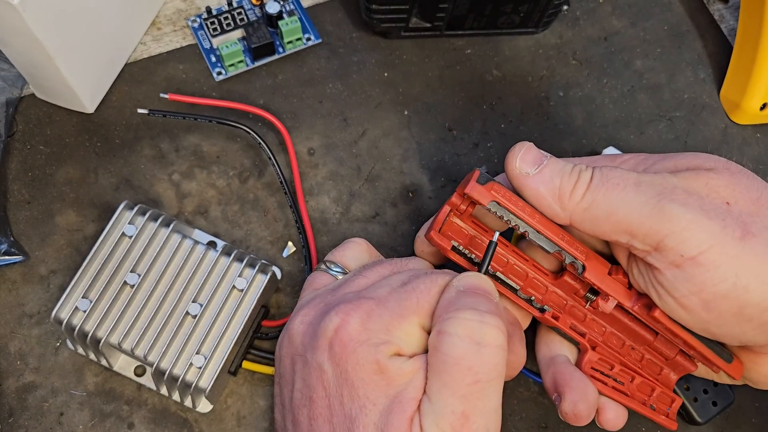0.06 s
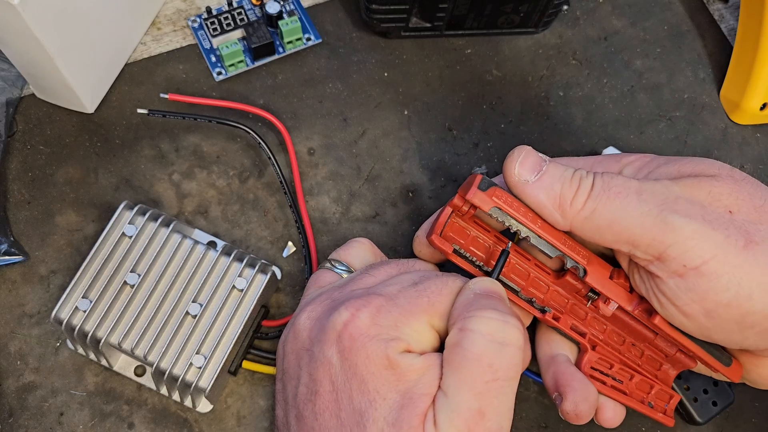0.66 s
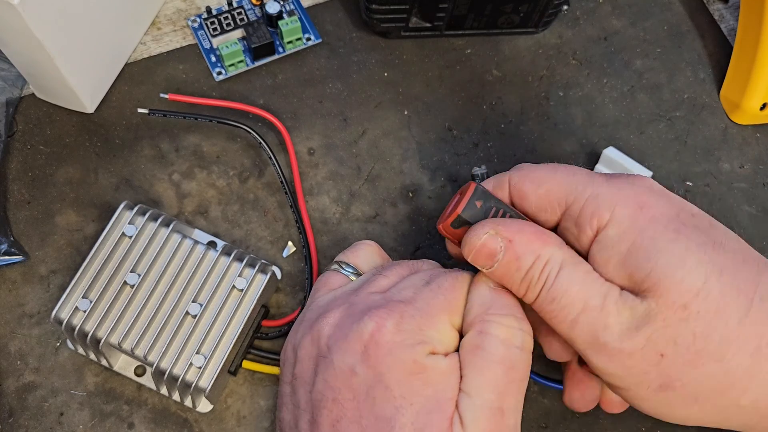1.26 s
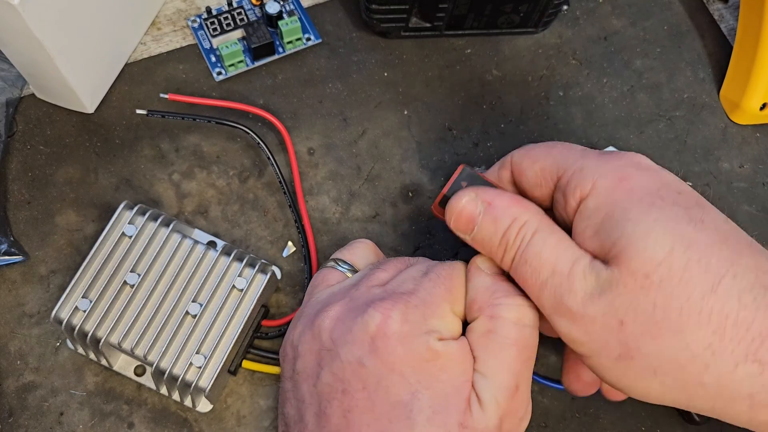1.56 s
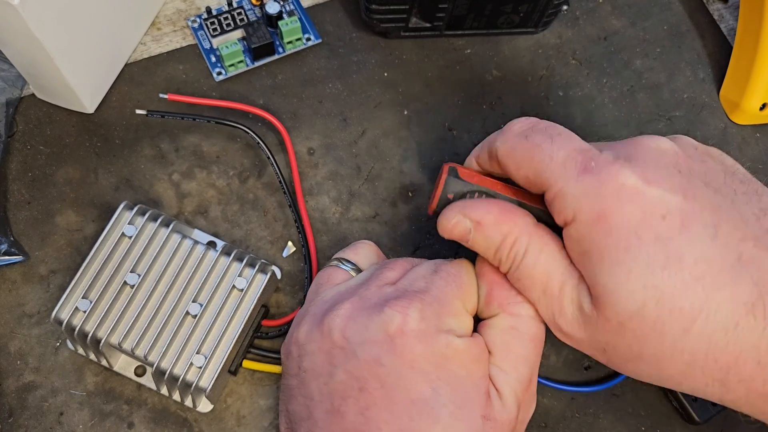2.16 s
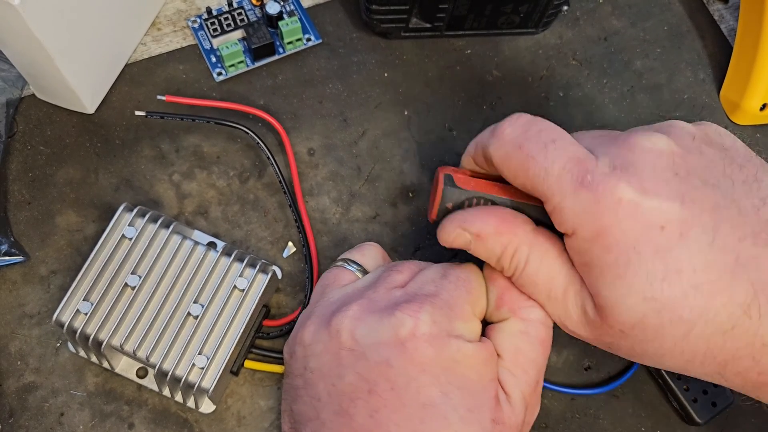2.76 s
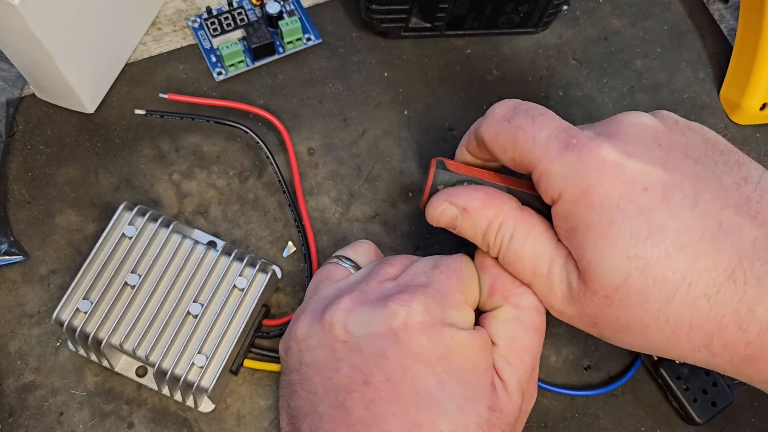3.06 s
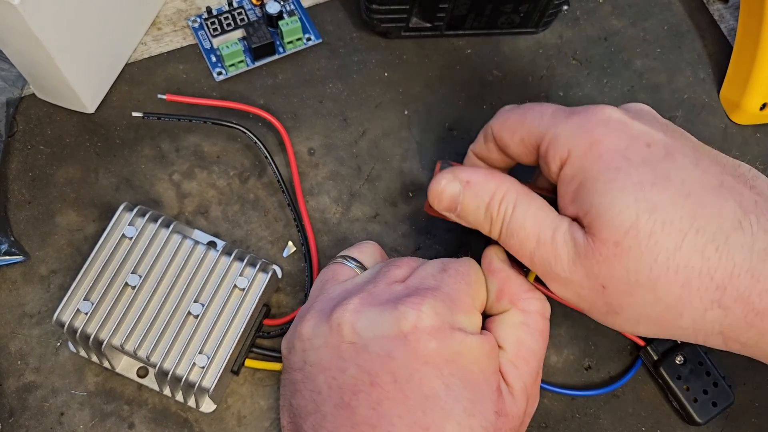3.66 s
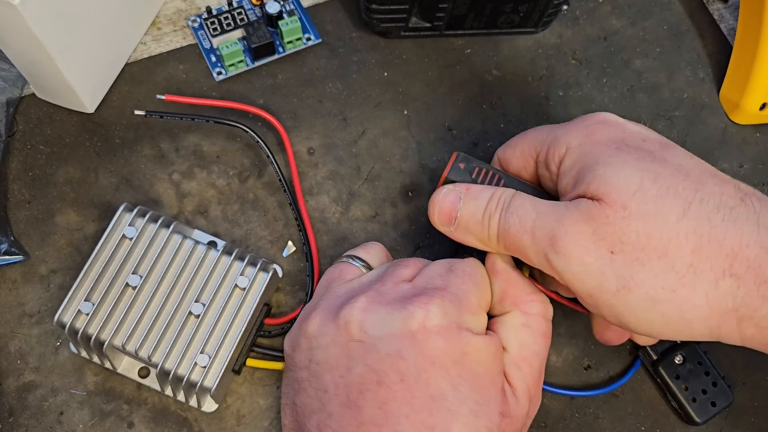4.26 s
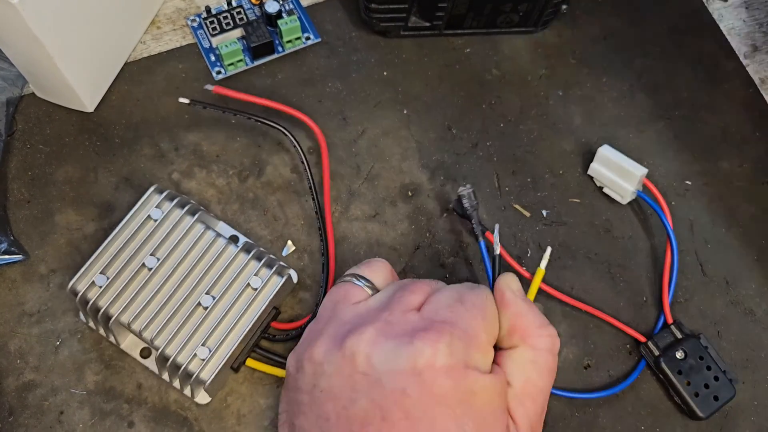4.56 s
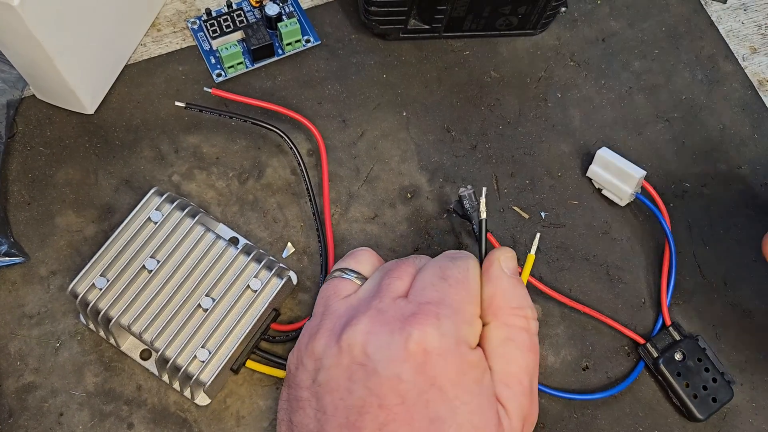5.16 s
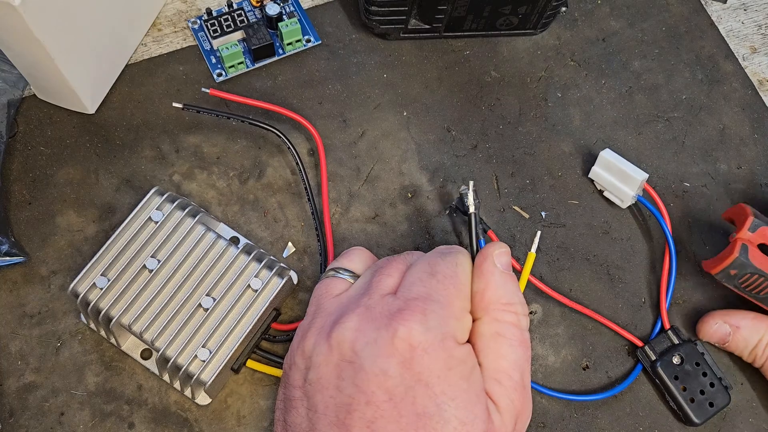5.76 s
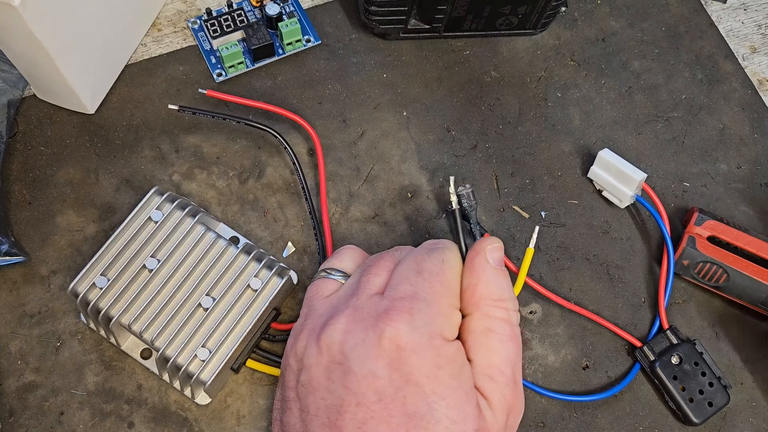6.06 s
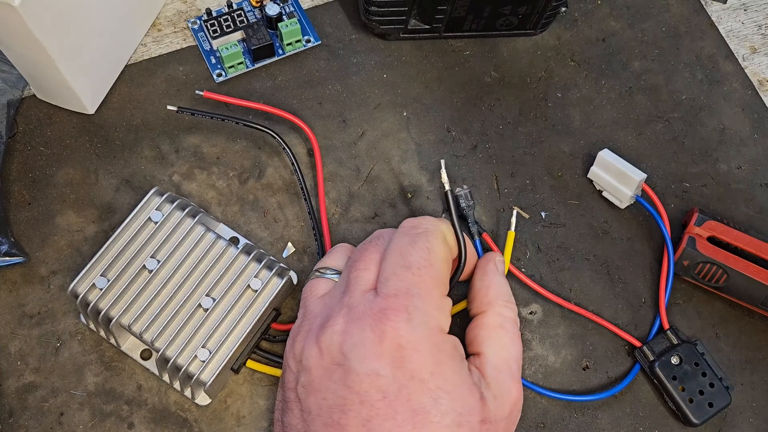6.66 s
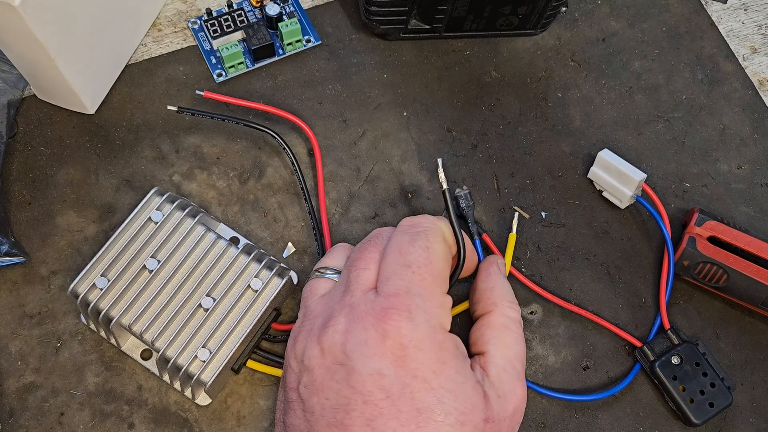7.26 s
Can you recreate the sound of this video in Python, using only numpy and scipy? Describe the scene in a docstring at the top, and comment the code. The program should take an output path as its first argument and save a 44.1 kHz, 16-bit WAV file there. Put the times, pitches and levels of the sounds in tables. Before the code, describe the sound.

In a small, quiet workshop, a plastic wire stripper is squeezed on a wire and gives off irregular creaks and sharp clicks that grow firmer. The workbench rumbles faintly and a loose object rocks. The tool then snaps loudly as the insulation gives, hands thump the bench and metal parts clatter with a short ring. Faint knocks and rustles follow as the tool is put down, all heard from close above the bench.

```python
"""Small workshop, close above a workbench. A plastic automatic wire stripper is squeezed on a wire:
its jaws slip and ring the frame in creaks and clicks. The straining hands make the bench rumble and
set a loose object rocking. The insulation gives: the tool snaps, the hands bump the bench, metal
parts clatter, and the top shudders on while the tool is put down."""
import sys
import numpy as np
from scipy import signal
from scipy.fft import rfft, irfft, next_fast_len
from scipy.io import wavfile
from scipy.ndimage import map_coordinates

SR = 44100
rng = np.random.default_rng(int(sys.argv[2]) if len(sys.argv) > 2 else 0)


def wav_record(signal):
    """Record a signal, one row per channel, as 16-bit PCM in the file named by sys.argv[1]."""
    frames = np.transpose(np.atleast_2d(signal))
    bounded = np.clip(frames, -1, 1)
    # unit amplitude maps onto the largest positive 16-bit level
    quanta = np.round(bounded * 32767).astype(np.int16)
    wavfile.write(sys.argv[1], SR, quanta)


N = 327618
AGE_S = np.arange(SR // 2) / SR  # time since a blow
SNAP_S = 4.478

# stripper frame modes: pitch_hz, width_hz, level_db
FRAME_MODES = [(938, 140, -4.5), (1387, 144, -6.5), (1937, 207, 1.5), (2370, 730, -5.5), (3026, 105, 4),
               (3540, 480, -4), (3835, 630, -2), (4500, 580, -2), (6050, 1030, -8), (7600, 570, -6)]
# slap on bench or handles: freq_hz, level_db
SLAP_SPECTRUM = [(100, -9), (390, 2.5), (560, -3), (780, 0.5), (970, -3.5), (1300, 3.5), (2200, -4.5),
                 (4200, -11.5), (8000, -18), (15000, -30.5)]
# thud of the bench top: freq_hz, level_db
THUD_SPECTRUM = [(30, -23), (90, -6.5), (130, 3), (330, -2.5), (480, -13.5), (2000, -48)]


def amp(db):
    """Decibels to gain."""
    return 10 ** (np.asarray(db) / 20)


def unit_rms(x):
    """Scale to rms 1."""
    return x / np.sqrt(np.mean(x ** 2) + 1e-20)


def log_interp(points, hz):
    """Interpolate (freq_hz, value) points on a log axis."""
    freq_hz, values = np.transpose(points)
    return np.interp(np.log(hz + 1), np.log(freq_hz + 1), values)


def envelope(rows):
    """Gain per sample from (time_s, level_db) rows, silent before the first."""
    time_s, level_db = np.transpose(rows)
    return amp(np.interp(np.arange(N) / SR, time_s, level_db, left=-120))


def fade(start_s, level_db, db_per_s):
    """Gain per sample: starts at start_s, dies away."""
    age_s = np.arange(N) / SR - start_s
    return (age_s >= 0) * amp(level_db - db_per_s * np.maximum(age_s, 0))


def decay(t60_s):
    """Exponential decay after a blow."""
    return amp(-60 * AGE_S / t60_s)


def add(track, start_s, sound):
    """Mix a sound into a track."""
    part = track[..., round(start_s * SR):][..., :sound.shape[-1]]
    part += sound[..., :part.shape[-1]]


def filtered(x, response):
    """Apply response(hz), scaled to keep the power of white noise."""
    size = 2 * next_fast_len(x.shape[-1] // 2 + SR // 4)
    gain = response(np.fft.rfftfreq(size, 1 / SR))
    return irfft(rfft(x, size) * gain / np.sqrt(np.mean(abs(gain) ** 2)), size)[..., :x.shape[-1]]


def coloured(x, spectrum):
    """Minimum-phase filter from (freq_hz, level_db) points."""
    def response(hz):
        cepstrum = irfft(np.log(amp(log_interp(spectrum, hz))))
        causal_fold = 1 + np.sign(np.fft.fftfreq(len(cepstrum)))
        return np.exp(rfft(cepstrum * causal_fold))
    return filtered(x, response)


def resonate(x, modes):
    """Drive (pitch_hz, width_hz, level_db) modes of alternating sign."""
    def response(hz):
        return sum((-1) ** k * amp(db) * 1j * hz * width_hz / (pitch_hz**2 - hz**2 + 1j * hz * width_hz)
                   for k, (pitch_hz, width_hz, db) in enumerate(modes))
    return filtered(x, response)


def noise(side_db, size=N):
    """Stereo white noise; side_db sets the width."""
    mid, side = rng.standard_normal((2, size))
    return unit_rms(np.array([mid + amp(side_db) * side, mid - amp(side_db) * side]))


def burst(t60_s, side_db):
    """One decaying noise burst."""
    return noise(side_db, len(AGE_S)) * decay(t60_s)


def wobble(rate_hz):
    """Smooth random curve, rate_hz knots a second."""
    knots = rng.standard_normal(int(N * rate_hz / SR) + 4)
    return map_coordinates(knots, [np.arange(N) * rate_hz / SR])


def contacts(rows, side_db):
    """Each (start_s, level_db, t60_s) contact is a dying swarm of tiny impacts."""
    power = np.zeros(N)
    for start_s, level_db, t60_s in rows:
        add(power, start_s, (amp(level_db) * decay(t60_s)) ** 2)
    return np.sqrt(power) * noise(side_db)


def room(x, wet_db):
    """Short workshop reverb, separate left and right tails."""
    # reverb time: freq_hz, t60_s
    reverb_times = [(100, 0.37), (3000, .16), (15000, 0.16)]
    hz, time_s, spectra = signal.stft(rng.standard_normal((2, len(AGE_S))), SR, nperseg=256)
    damping = amp(-60 * time_s / log_interp(reverb_times, hz)[:, None])
    tail = signal.istft(spectra * damping, SR, nperseg=256)[1]
    wet = signal.fftconvolve(x, tail / np.linalg.norm(tail[0]), axes=1)
    return x + amp(wet_db) * wet[:, :x.shape[-1]]


def strike(modes, treble_db, crack_t60_s, scatter_db):
    """A blow rings the modes and cracks; hands and bench scatter it at once."""
    # crack: freq_hz, level_db
    crack_spectrum = [(300, -24.5), (1100, -15.5), (2000, -8), (4500, -4.5), (8700, 2.5), (10000, -10),
                      (13000, 0), (15500, -4.5)]
    ring = resonate(signal.unit_impulse(len(AGE_S)), modes)
    crack = coloured(burst(crack_t60_s, side_db=0), crack_spectrum)
    direct = ring / abs(ring).max() + amp(treble_db) * crack
    echoes = rng.standard_normal((2, len(AGE_S))) * decay(t60_s=0.014) * (1 - np.exp(-AGE_S / 0.0003))
    scatter = signal.fftconvolve(direct, echoes / np.linalg.norm(echoes[0]), axes=1)
    left, right = direct + amp(scatter_db) * scatter[:, :len(AGE_S)]
    return np.array([np.roll(left, 1), right])  # tool slightly to the right


def air():
    """Quiet, steady workshop air."""
    # room tone: freq_hz, level_db
    air_spectrum = [(20, -7.5), (140, -4), (300, -10), (480, -20.5), (620, -24.5), (2100, -30.5),
                    (3400, -36), (16000, -54)]
    return amp(-69.5) * coloured(noise(side_db=-4.5), air_spectrum)


def bench_rumble():
    """The top rumbles under the straining hands, lurches at the snap, comes to rest."""
    # rumble under the hands: time_s, level_db
    strain = [(0, -71.5), (1.0, -77.5), (2.3, -61.5), (2.42, -55.5), (4.42, -57)]
    # hands lean on the bench: centre_s, level_db
    leans = [(2.57, -48.5), (2.76, -54), (2.95, -51), (6.02, -52)]
    # swaying top: freq_hz, level_db
    rumble_spectrum = [(15, -11), (35, 3), (75, -2), (110, -8.5), (400, -59)]
    lean_s, relax_db_per_s = 0.14, 5.5
    since_snap_s = np.maximum(np.arange(N) / SR - SNAP_S, 0)
    recoil = fade(SNAP_S, level_db=-39, db_per_s=24.5)
    push = envelope(strain) * amp(-relax_db_per_s * since_snap_s) + recoil
    for centre_s, level_db in leans:
        add(push, centre_s - lean_s / 2, amp(level_db) * np.hanning(int(lean_s * SR)))
    return push * coloured(noise(side_db=-22), rumble_spectrum)


def rubbing():
    """Grainy friction: fingers rustle, scrapes swell and fade, the freed cable settles."""
    # finger rustle: time_s, level_db
    handling = [(.8, -83.5), (4.6, -85), (5.7, -77.5), (7.2, -91.5)]
    # skin, cable and tool scrapes: start_s, length_s, level_db
    scrapes = [(0.89, 0.087, -77), (3.661, 0.05, -64.5), (3.994, 0.098, -54.5), (4.215, 0.037, -66.5),
               (5.858, 0.25, -68), (5.949, 0.062, -58)]
    # friction: freq_hz, level_db
    skin_spectrum = [(300, -12.5), (1800, 2), (8500, -2), (10000, -17), (16000, -10)]
    cable = fade(start_s=4.644, level_db=-50.5, db_per_s=37.5)
    stroke = envelope(handling) + cable
    for start_s, length_s, level_db in scrapes:
        add(stroke, start_s, amp(level_db) * np.hanning(int(length_s * SR)))
    grain = unit_rms(amp(2.5 * wobble(rate_hz=250) + 1.7 * wobble(rate_hz=25)))
    return stroke * grain * coloured(noise(side_db=-1.9), skin_spectrum)


def frame_clicks():
    """The jaws creep along the insulation in slips that ring the frame; harder is brighter."""
    # jaw slips, then the tool set down: start_s, level_db, centre_hz
    slips = [(0.8304, -59, 2640), (1.0256, -42.5, 2620), (1.0317, -39, 4300), (1.2517, -46, 1760),
             (1.3977, -42, 2400), (1.4087, -37.5, 2220), (1.4233, -38, 2350), (1.52, -32.5, 2700),
             (1.746, -31.5, 3000), (1.8963, -30.5, 3420), (2.1345, -43, 2400), (2.147, -28.5, 3420),
             (2.538, -43, 2430), (2.5692, -27, 3850), (3.211, -40.5, 2100), (3.2285, -30.5, 1580),
             (3.5744, -45, 1480), (4.023, -44.5, 2020), (4.1142, -48, 2380), (5.5856, -50, 1720),
             (5.991, -51, 2000), (6.006, -47.5, 2380)]
    firm_slip_db, firm_treble_db = -33, -16.5
    octave_loss_db = 12  # mode one octave from centre_hz
    pitch_hz, width_hz, mode_db = np.transpose(FRAME_MODES)
    out = np.zeros((2, N))
    for start_s, level_db, centre_hz in slips:
        grip_detune = 1 + rng.normal(0, 0.012, len(pitch_hz))
        treble_db = firm_treble_db + level_db - firm_slip_db
        focus_db = np.maximum(-octave_loss_db * np.log2(pitch_hz / centre_hz) ** 2, treble_db)
        modes = np.transpose([pitch_hz * grip_detune, width_hz, mode_db + focus_db])
        click = strike(modes, treble_db + 0.5, crack_t60_s=0.0064, scatter_db=-4)
        knock = coloured(burst(t60_s=0.032, side_db=-14.5), SLAP_SPECTRUM)
        click += amp(level_db / 2 - 8) * knock  # harder slips knock the handles
        add(out, start_s + 0.0008, amp(level_db + 3.5) * room(click, wet_db=-7))
    thuds = [(start_s, 2 * db + 3, 0.06) for start_s, db, _ in slips]  # the hardest reach the bench
    return out + coloured(contacts(thuds, side_db=-15), THUD_SPECTRUM)


def strand_ticks():
    """Wire strands flick past an edge: thin cracks that hardly ring the frame."""
    # strand flicks: start_s, level_db
    flicks = [(1.629, -57.5), (2.376, -57), (2.424, -55), (3.0591, -52), (4.053, -50.5), (4.985, -50),
              (5.1756, -51), (5.221, -53), (5.387, -51.5), (5.5242, -46)]
    out = np.zeros((2, N))
    for start_s, level_db in flicks:
        tick = strike(FRAME_MODES, treble_db=2.5, crack_t60_s=0.011, scatter_db=-9.5)
        add(out, start_s, amp(level_db) * room(tick, wet_db=-4.5))
    return out


def bench_bumps():
    """Hands and cable hit the bench: a slap plus a thud of the top."""
    # hits: start_s, slap_db, thud_db, t60_s
    hits = np.array([(1.632, -54, -60, 0.03), (4.544, -28, -34.5, 0.12), (4.555, -26, -37, 0.082),
                     (4.611, -35, -36.5, 0.091), (4.6392, -16.5, -19.5, 0.081),
                     (4.647, -31.5, -15.5, 0.079), (5.993, -53, -42.5, 0.095)])
    start_s, slap_db, thud_db, t60_s = hits.T
    slap = coloured(contacts(zip(start_s, slap_db, t60_s), side_db=-1.5), SLAP_SPECTRUM)
    thud = coloured(contacts(zip(start_s, thud_db, t60_s), side_db=-19), THUD_SPECTRUM)
    return room(slap, wet_db=-8) + thud


def rocking_knocks():
    """(start_s, level_db, t60_s) knocks: swings shorten and weaken until the next shove."""
    # hands shove the loose object: start_s, level_db
    shoves = [(3.059, -55), (3.349, -50.5), (3.894, -55.5), (4.043, -50), (4.968, -46), (5.543, -54),
              (5.952, -59.5), (6.19, -57)]
    period_s, shrink_ratio, swing_loss_db, t60_s = 0.143, 0.99, 3.5, 0.35
    swings = np.arange(9)
    delay_s = period_s * (np.cumsum(shrink_ratio ** swings) - 1)
    ends_s = [start_s - period_s / 2 for start_s, _ in shoves[1:]] + [N / SR]
    return [(start_s + delay_s[k], level_db - swing_loss_db * k, t60_s)
            for (start_s, level_db), end_s in zip(shoves, ends_s)
            for k in swings if start_s + delay_s[k] < end_s]


def rocking_and_shudder():
    """A loose object knocks on the top, which rings with it and shudders on after the bumps."""
    # rocking object: freq_hz, level_db
    knock_spectrum = [(100, -2), (370, 6), (490, 1), (720, 8), (880, -7), (1100, -5), (1400, -18.5),
                      (2000, -18), (4000, -41.5)]
    # ringing of the top: time_s, level_db
    shudder_levels = [(4.64, -37), (5.3, -51.5), (6.3, -59), (7.0, -63.5), (7.43, -81.5)]
    # bench modes: pitch_hz, width_hz, level_db
    bench_modes = [(127.16, 16, -1), (183, 41, -4), (230.2, 18, -0.5), (262.5, 11, 2), (296, 12, 0),
                   (362, 42, -8), (414, 36, -10)]
    knocks = rocking_knocks()
    rocking = coloured(contacts(knocks, side_db=-3), knock_spectrum)
    shudder = envelope(shudder_levels) * noise(side_db=-15)
    top = resonate(shudder + amp(5) * contacts(knocks, side_db=-18), bench_modes)
    return amp(-1) * rocking + top


def snap():
    """The insulation gives: jaws slam open, the spring jangles, recoil thumps the bench."""
    # tear and spring: freq_hz, level_db
    jangle_spectrum = [(300, -14.5), (2000, -2.5), (4000, -4.5), (8700, -2.5), (10000, -9.5), (13000, -7),
                       (15500, -14.5)]
    # jaws at their stop: pitch_hz, width_hz, level_db
    jaw_modes = [(1990, 190, -4.5), (2760, 57, -2), (3670, 710, -4), (4150, 300, -0.5), (5180, 500, -13.5)]
    thump_hz = 68
    rips = [(SNAP_S - 0.0065, -43, 0.05), (SNAP_S - 0.0025, -25, 0.03)]
    tear = coloured(contacts(rips, side_db=-6), jangle_spectrum)
    slam = room(strike(jaw_modes, treble_db=-11, crack_t60_s=0.024, scatter_db=-7.5), wet_db=-9.5)
    jangle = coloured(burst(t60_s=0.29, side_db=-1.9), jangle_spectrum)
    thump = np.sin(2 * np.pi * thump_hz * AGE_S) * decay(t60_s=0.098) * (1 - np.exp(-AGE_S / 0.003))
    thud = coloured(contacts([(SNAP_S, -30, 0.12)], side_db=-16.5), THUD_SPECTRUM)
    out = tear + thud
    add(out, SNAP_S, amp(-2.1) * slam + amp(-31) * jangle + amp(-18.5) * thump)
    return out


def metal_clatter():
    """Metal parts jump and settle; each contact weights their modes anew."""
    # loose parts land: start_s, level_db, t60_s
    landings = [(4.693, -26.5, 0.09), (4.703, -18.5, 0.099), (4.724, -26, 0.069), (4.746, -41, 0.152),
                (4.800, -29.5, 0.09), (4.875, -38.5, 0.16), (5.048, -42.5, 0.12)]
    # contact noise: freq_hz, level_db
    chatter_spectrum = [(200, -10.5), (1500, 2), (4500, -9), (8500, -16), (10000, -19), (15000, -24)]
    # part modes: pitch_hz, width_hz, level_db
    metal_modes = [(710, 86, -9), (1280, 90, -8.5), (1433, 74, 0.5), (1578, 36, 3), (2133, 39, 1),
                   (2270, 61, -4), (3185, 40, -5.5), (4180, 120, -3), (4960, 140, -10.5), (7240, 150, -14)]
    # parts ring on: start_s, pitch_hz, level_db, t60_s
    pings = [(4.704, 1577, -50, 0.21), (4.707, 1523, -40, 0.31), (4.877, 1710, -41.5, 0.29),
             (5.06, 1517, -43.5, 0.43)]
    out = amp(-0.5) * coloured(contacts(landings, side_db=0.5), chatter_spectrum)
    for start_s, level_db, t60_s in landings:
        modes = [(hz, width_hz, db + rng.normal(0, 2.3)) for hz, width_hz, db in metal_modes]
        force = amp(level_db - 0.5) * burst(0.76 * t60_s, side_db=-0.5)
        add(out, start_s, resonate(force, modes))
    out = room(out, wet_db=-1.5)
    for start_s, pitch_hz, level_db, t60_s in pings:
        drift_rad = 0.0088 * np.cumsum(rng.standard_normal(len(AGE_S)))  # part buzzes on its support
        tone = np.sin(2 * np.pi * pitch_hz * AGE_S + drift_rad)
        add(out, start_s, amp(level_db) * decay(t60_s) * tone)
    return out


def scene():
    """Workshop air, tool, bench and hands."""
    background = air()
    tool = frame_clicks() + strand_ticks() + snap()
    bench = bench_bumps() + metal_clatter() + bench_rumble() + rocking_and_shudder()
    return background + tool + bench + rubbing()


def record(dry):
    """Steep low-pass."""
    cutoff_hz = 15600
    return signal.sosfilt(signal.butter(12, cutoff_hz, fs=SR, output="sos"), dry)


dry = scene()
out = record(dry)
wav_record(out)
```